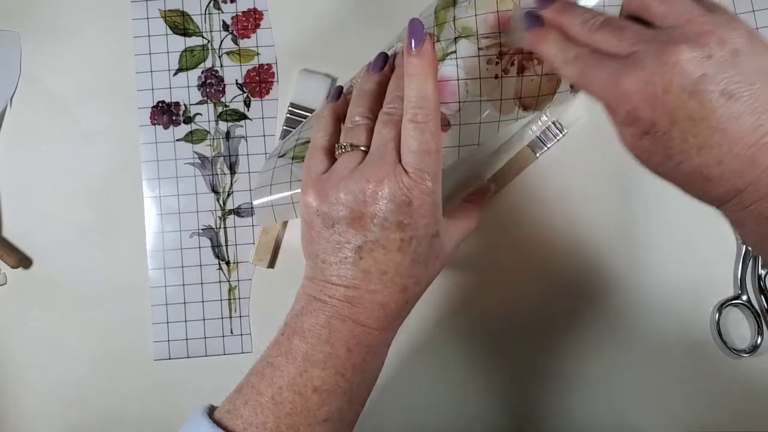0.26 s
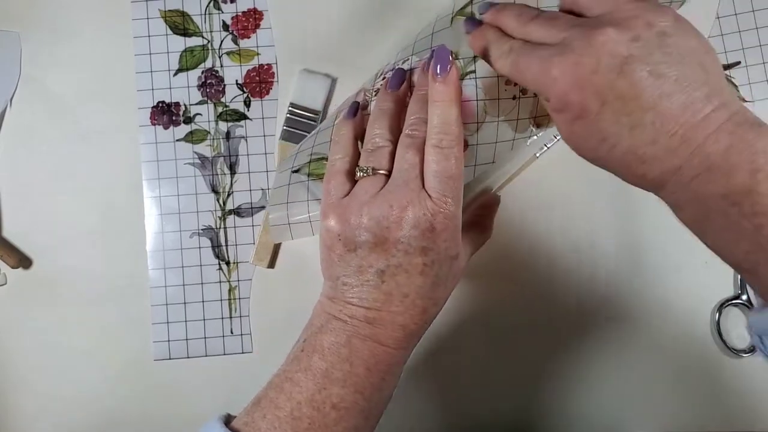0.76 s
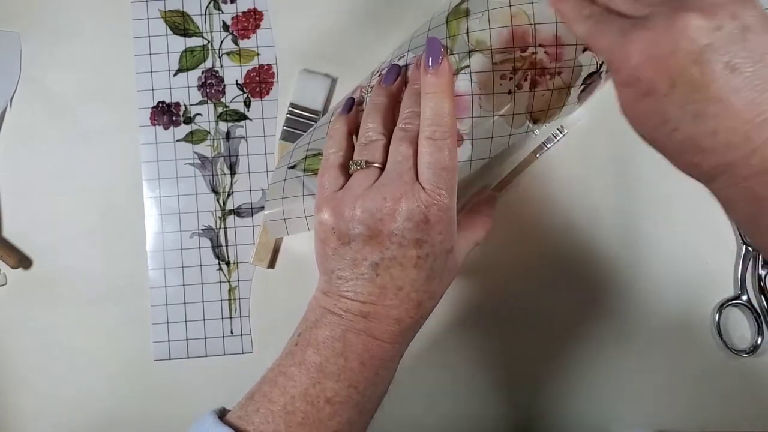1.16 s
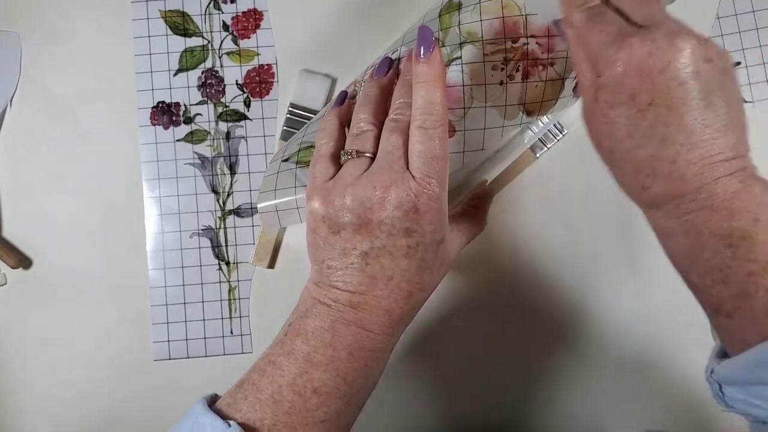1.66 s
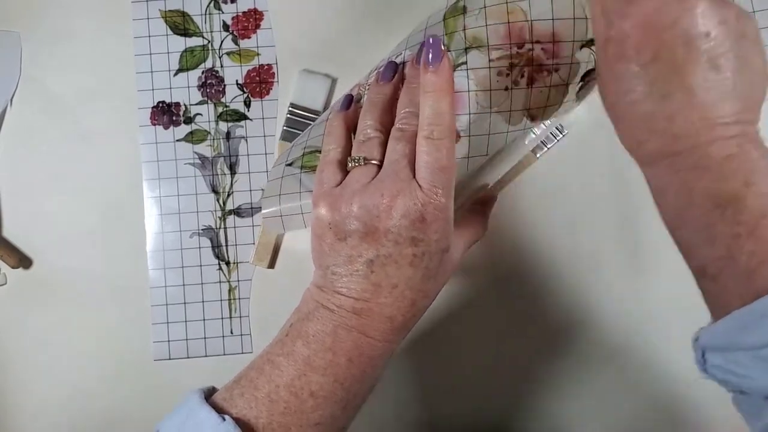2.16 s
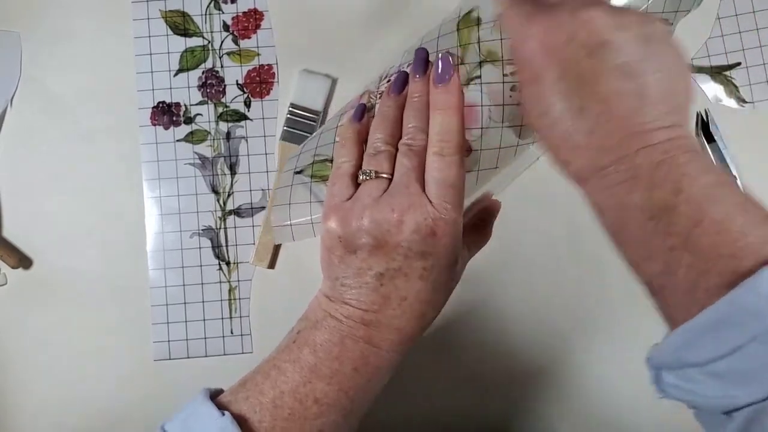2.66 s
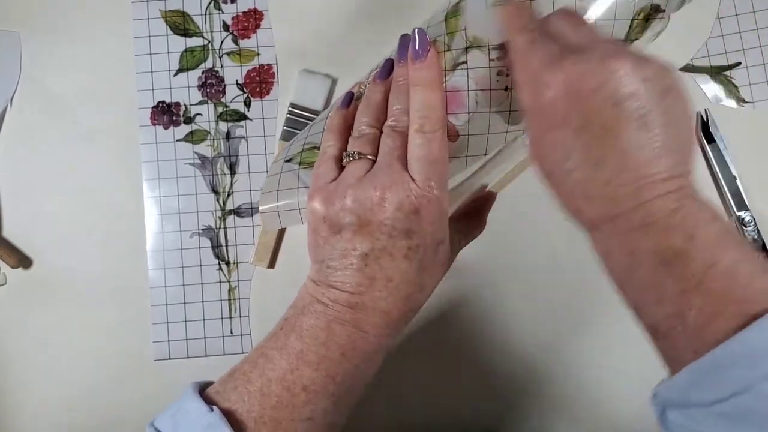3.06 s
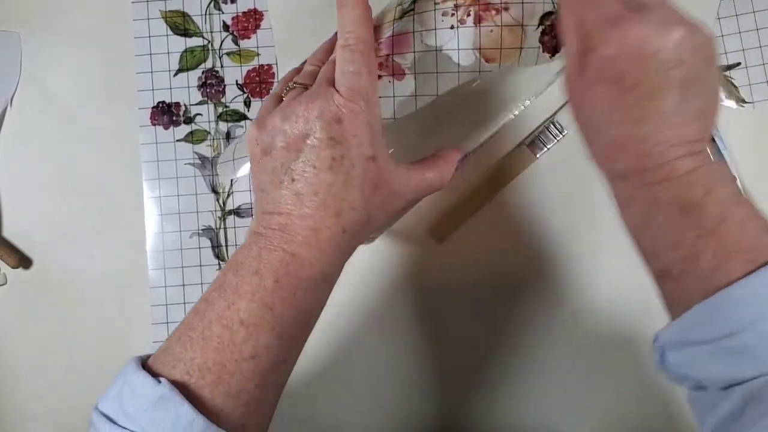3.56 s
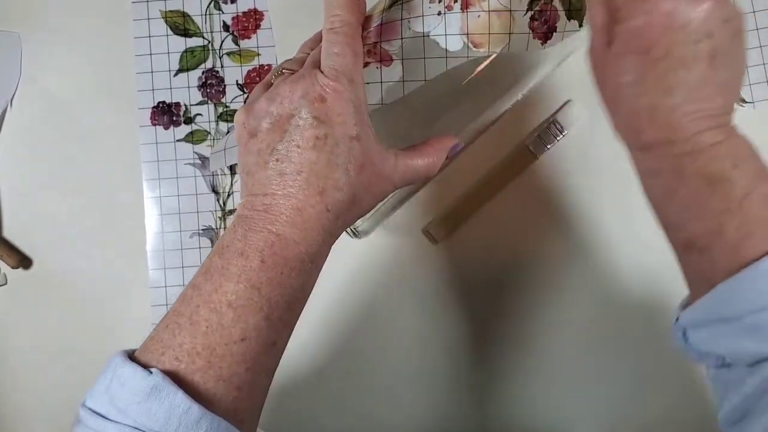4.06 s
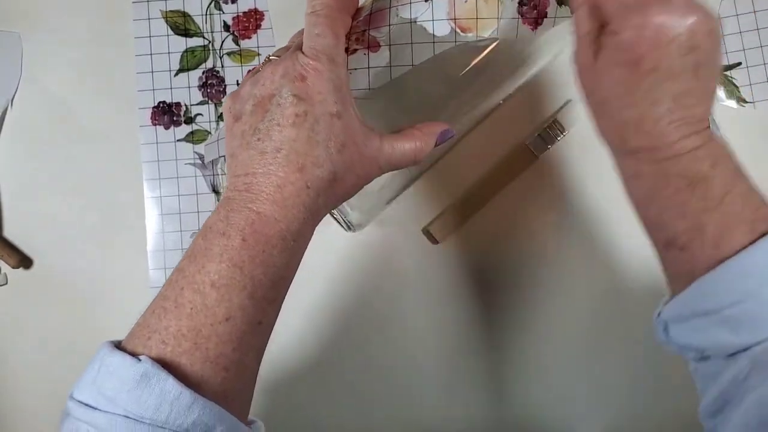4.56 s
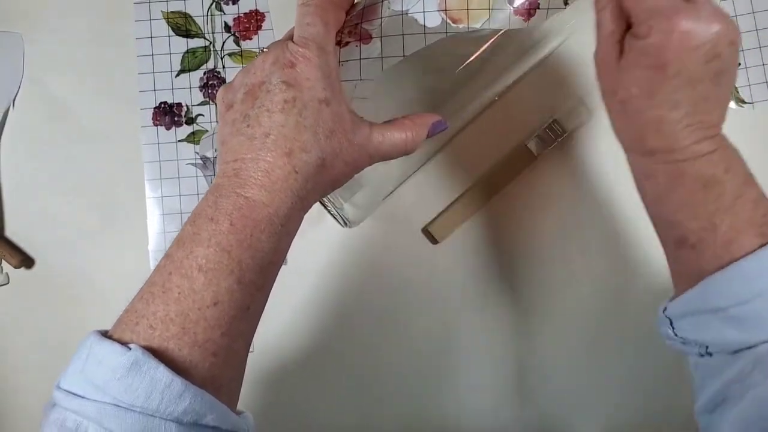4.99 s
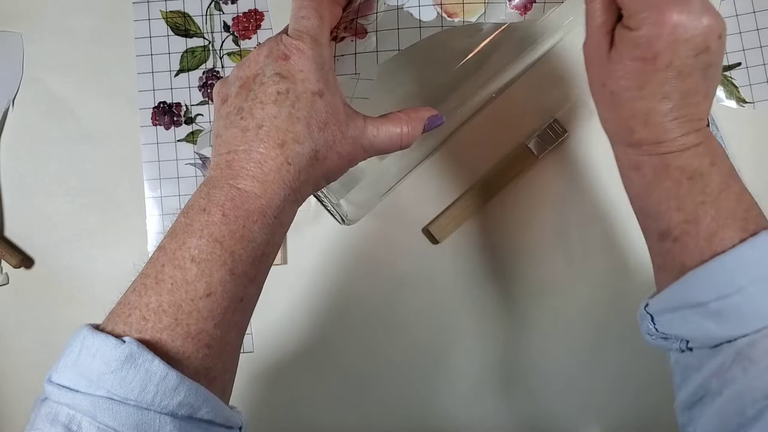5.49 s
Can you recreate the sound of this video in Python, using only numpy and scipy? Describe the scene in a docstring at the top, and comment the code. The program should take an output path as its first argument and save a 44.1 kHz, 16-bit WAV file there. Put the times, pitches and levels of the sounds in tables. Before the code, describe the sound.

Quick hard scraping strokes on a glass jar, nearly silent at first, build into rasping, squeaking rubs with small chirps, ticks and dull table knocks.

```python
"""A small quiet room, a phone with two microphone ports close by: a flat plastic stick is rubbed hard
to and fro over a transfer film on a hand-held glass jar. Grit-like catches of the edge ring the glass
(damped resonances) and the bent stick; the film hisses in noise bands, the push rumbles through jar and table.
Now and then the edge slips with a short chirp or taps the glass, the film crackles or the table knocks."""
import sys
import numpy as np
from scipy import signal
from scipy.fft import rfft, irfft
from scipy.io import wavfile
from scipy.ndimage import uniform_filter1d

SR = 44100
rng = np.random.default_rng(int(sys.argv[2]) if len(sys.argv) > 2 else 0)


def generate_wav(sig):
    """Save sig (samples, or channels by samples) to the path in sys.argv[1] as 16-bit PCM at SR."""
    pcm = np.round(np.clip(np.atleast_2d(sig).T, -1, 1) * 32767).astype(np.int16)
    wavfile.write(sys.argv[1], SR, pcm)


N = 252693


def undb(db):
    """Turn dB into gain."""
    return 10 ** (np.asarray(db) / 20)


def level(x, db):
    """Set the rms level."""
    return x * undb(db) / np.sqrt(np.mean(x ** 2))


def colour(x, points):
    """Shape a sound by (f/Hz, level/dB) points with a causal, minimum-phase response."""
    hz, db = np.transpose(points)
    grid = np.linspace(1, SR / 2, 2049)
    log_gain = np.interp(np.log(grid), np.log(hz), db) * np.log(10) / 20
    cepstrum = irfft(log_gain)
    # fold the cepstrum onto positive times to make it causal
    cepstrum[1:2048] *= 2
    cepstrum[2049:] = 0
    return signal.oaconvolve(x, irfft(np.exp(rfft(cepstrum))))[:N]


def ring(x, hz, width_hz):
    """One resonance, gain near 1 at its centre; the complex output carries the phase."""
    pole = np.exp((2j * np.pi * hz - np.pi * width_hz) / SR)
    return 2 * (1 - abs(pole)) * signal.lfilter([1], [1, -pole], x)


def walk(rate):
    """Random levels, a new one every 1 / rate s, slewed between; spread near 1."""
    hold = int(SR / rate)
    steps = np.repeat(rng.standard_normal(N // hold + 1), hold)
    return 1.41 * uniform_filter1d(steps, hold)[:N]


def grit(spread_db):
    """Dense tiny catches: most are faint, a few stand out."""
    noise = rng.standard_normal(N)
    prominence = rng.exponential(size=N).clip(0, 6)
    return level(noise * undb(spread_db * prominence), 0)


def add(track, s, sound):
    """Mix a sound in at a time."""
    i = int(s * SR)
    track[i:i + len(sound)] += sound[:len(track) - i]


# strokes, alternately back and forth: start t/s, length t/s, place of the hardest push [0-1], scrape level/dB
STROKES = [(0.068, 0.12, 0.02, -99), (0.238, 0.084, 0.53, -77.5), (0.397, 0.13, 0.04, -88),
           (0.535, .11, .42, -79), (0.689, 0.082, 0, -79), (0.841, 0.073, 1, -87), (0.932, 0.12, 0.21, -71),
           (1.102, 0.09, 0.63, -67.5), (1.19, .14, 0.39, -74), (1.386, .12, 0.54, -72),
           (1.511, 0.18, 0, -89), (1.636, .13, 0.41, -53), (1.787, .11, 0.45, -45),
           (1.956, 0.11, 0.3, -47.5), (2.058, .12, 0.47, -34.5), (2.227, 0.099, 0.29, -54),
           (2.357, .1, .42, -45), (2.476, 0.1, 0.22, -46.5), (2.632, .12, 0.42, -40.5),
           (2.742, 0.11, 0.32, -44.5), (2.897, 0.11, 0.47, -47.5), (3.008, 0.11, 0.62, -41),
           (3.145, 0.11, 0.54, -36), (3.259, .13, .5, -39.5), (3.376, .15, 0.46, -35.5),
           (3.547, 0.11, 0.28, -33.5), (3.652, 0.13, 0.47, -35), (3.812, 0.1, 0.5, -31.5),
           (3.917, .11, 0.33, -31.5), (4.048, 0.08, 0.76, -31.5), (4.155, 0.13, 0.31, -32.5),
           (4.294, 0.11, 0.57, -29.5), (4.416, .11, 0.47, -35.5), (4.559, .11, 0.42, -39),
           (4.691, 0.094, .52, -36.5), (4.807, 0.094, 0.51, -39.5), (4.914, .11, 0.45, -39.5),
           (5.022, 0.093, 0.54, -40), (5.162, 0.094, 0.41, -38), (5.266, 0.11, 0.27, -40.5),
           (5.409, 0.073, 0.52, -46.5), (5.524, .12, 0.41, -42.5), (5.666, 0.12, .35, -50)]


def strokes(levels_db, ends_db, grip, release, skewed=True):
    """The edge speeds up and slows down once a stroke; a layer is ends_db weaker at the turns and dies beyond.
    High grip or release powers give a flat top with a sudden start or end."""
    out = np.full(N, 1e-7)
    for (s, length, place, _), db in zip(STROKES, levels_db):
        u = np.linspace(-.5, 1.5, int(2 * length * SR))  # 0 and 1 are the turns
        top = np.clip(place, .1, .9) if skewed else .5
        before = (abs(u - top) / top) ** grip
        after = (abs(u - top) / (1 - top)) ** release
        fade = np.where(u < top, before, after)
        add(out, max(s - length / 2, 0), undb(db - ends_db * fade))
    return out


BEARS_DOWN_S = 1.6  # from here on, back strokes differ from forward ones


def per_stroke(curve, back_db=0):
    """Level of each stroke from a curve; every other stroke is a back stroke."""
    start = np.transpose(STROKES)[0]
    back = (np.arange(len(start)) % 2 == 0) & (start > BEARS_DOWN_S)
    return np.interp(start, *np.transpose(curve)) + back_db * back


# drive of the lowest glass mode on forward strokes: t/s, relative level/dB
LOWEST_DRIVE = [(0, -71), (1.2, -73.5), (1.38, -62), (1.52, -77), (1.64, -47), (1.94, -38.5), (2.47, -48),
                (2.75, -37), (3.02, -34.5), (3.3, -33), (3.55, -35), (4.05, -40), (4.3, -36.5), (4.56, -34),
                (4.8, -39), (5.7, -36)]
# drive of the second glass mode on forward strokes: t/s, relative level/dB
SECOND_DRIVE = [(0, -95), (0.55, -80.5), (1.1, -74.5), (1.38, -85), (1.64, -55.5), (1.94, -39.5),
                (2.35, -38.5), (2.55, -50), (2.75, -42), (3.8, -36), (3.92, -55), (4.16, -35), (4.36, -42),
                (4.56, -31.5), (4.8, -31), (5.53, -33.5), (5.67, -45)]
LOWEST_BACK_DB, SECOND_BACK_DB = -13, -3  # back strokes drive them less


def edge_forces():
    """The same catches of the edge drive the scrape and the two lowest glass modes, each by its own strokes."""
    # the pressure judders within a stroke
    catches = grit(3.7) * undb(2.0 * walk(110))
    scrape = catches * strokes(np.transpose(STROKES)[-1], ends_db=37.0, grip=0.94, release=0.9)
    low_db = per_stroke(LOWEST_DRIVE, LOWEST_BACK_DB)
    low = catches * strokes(low_db, ends_db=39.0, grip=2.57, release=3.23)
    second_db = per_stroke(SECOND_DRIVE, SECOND_BACK_DB)
    second = catches * strokes(second_db, ends_db=37.0, grip=2.97, release=2.72)
    return scrape, low, second


# hand-damped glass modes: f/Hz, width f/Hz, level/dB, left minus right level/dB, half the phase lead of the left [rad]
GLASS_MODES = [(1626, 37, -7, -1.5, 0.24), (2792, 52.3, 1.5, -3.5, 0.63), (3320, 11, -22, -1, -0.36),
               (3448, 91, -7, -9, -0.18), (3810, 90, -5, 8, 1), (3969, 82, -1.5, -3, 0.52),
               (4950, 52, -8.5, 14.5, -0.78), (5430, 71, -12.5, -13, -0.36), (6380, 21, -29, 31, -1.9),
               (7620, 16, -35.5, 25, 0.45), (10600, 37, -38, -7, .3)]
MODE_WANDER = .004  # the grip detunes the glass by this share


def glass(low, second, scrape, brush, blows):
    """The two lowest modes have their own drive; the others swell and fade as the edge crosses their patterns.
    Each reaches the two microphone ports in its own phase."""
    out = np.zeros((2, N))
    for k, (hz, width_hz, db, pan_db, lead) in enumerate(GLASS_MODES):
        if k < 2:
            rub = (low, second)[k]
        else:
            brush_db = 0 if hz > 6000 else -30
            rub = (scrape + brush * undb(brush_db)) * undb(4.0 * walk(20))
        z = ring((rub + blows) * undb(db), hz, width_hz)
        z = z * np.exp(2j * np.pi * np.cumsum(MODE_WANDER * hz * walk(12)) / SR)
        turn = np.exp(1j * (lead + .35 * walk(9)))
        out += [(z * turn).imag * undb(pan_db / 2), (z / turn).imag * undb(-pan_db / 2)]
    # the wall radiates little below its lowest mode
    return signal.sosfilt(signal.butter(4, 1000, "high", fs=SR, output="sos"), out)


# the scrape swells and fades in these bands, each on its own: f/Hz
RASP_BANDS_HZ = [1300, 2100, 3120, 4280]


def rasp(x):
    """The colour of the scrape shifts within a stroke as the edge catches here and there."""
    bands = sum(undb(4.5 * walk(40)) * ring(x, hz, .3 * hz).real for hz in RASP_BANDS_HZ)
    return undb(-6) * x + bands / 2


FLEX_BACK_DB = 3  # the stick bends harder on back strokes


def bending():
    """Fine grit bends the stick once a stroke."""
    bend_db = np.transpose(STROKES)[-1] + per_stroke([(0, 0)], FLEX_BACK_DB)
    return grit(1.6) * strokes(bend_db, ends_db=45.5, grip=1.75, release=1.24)


def flex(force, hz, width_hz, rise, drift):
    """A broad resonance of the bent stick: it glides by rise (down if negative) through each stroke
    and back after it, and wanders with the grip."""
    start, length = np.transpose(STROKES)[:2]
    turns = np.sort(np.stack([start, start + .9 * length], axis=1).ravel())
    along = np.interp(np.arange(N) / SR, turns, np.tile([-1, 1], len(start)))
    phase = 2 * np.pi * np.cumsum(hz * (1 + rise * along + drift * walk(11))) / SR
    # filter around 0 Hz, then shift up to the moving centre
    envelope = ring(ring(force, 0, width_hz), 0, width_hz)
    return (envelope * np.exp(1j * phase)).imag


# colour of the flexing blade: f/Hz, level/dB
STICK_COLOUR = [(820, -40.5), (940, -1.5), (1000, -4.5), (1300, 0.5), (2000, -0.5), (4200, 4), (5500, -12),
                (7000, -28.5)]


def stick(scrape, low, second, bend, slide, chirps):
    """The flexing blade sounds the rasp and the slips; two gliding resonances follow its bend and the slide."""
    rubbing = rasp(scrape + undb(-7) * second + undb(-22.5) * low)
    blade = undb(-2.0) * colour(rubbing, STICK_COLOUR) + undb(-5.0) * chirps
    blade += undb(4) * flex(bend, 3100, 647, 0.38, 0.05)
    return blade + undb(-10.0) * flex(slide, 1200, 270, -0.0366, 0.064)


# slips of the edge, and at 5.20 and 5.28 s two short ticks of the edge on the glass that ring at one pitch:
# t/s, relative level/dB, chatter f/Hz, fall t/ms
SLIPS = [(2.1275, -26, 3470, 2.5), (2.252, -36.5, 2733, 4.3), (2.3946, -27.5, 2680, 5.3),
         (2.674, -23, 3320, 12), (2.771, -31.5, 2700, 13), (3.5741, -13.5, 3740, 1.4),
         (3.5879, -16.5, 3956, 5), (3.844, -25.5, 3940, 4.8), (3.859, -15.5, 3640, 1.7),
         (3.9516, -6.5, 4184, 2.1), (4.093, -14, 3900, 3.5), (4.196, -8.5, 4110, 1.1),
         (4.2122, -24, 3700, 1.7), (4.344, -17, 3790, 4.8), (4.355, -4, 3830, 0.52), (4.465, -20, 2950, 5),
         (5.065, -24.5, 3900, 2.7), (5.2033, -22.5, 3530, 0.58), (5.278, -25, 2890, 1.6)]
SLIP_RISE_SHARE = 0.27  # of the fall time
UNDERTONE_HZ, UNDERTONE_DB, UNDERTONE_FALL_MS = 2700, -9.5, 5.9  # a lower chatter under every slip


def slip_shape(t, fall_ms):
    """A quick rise and an exponential fall, as the edge lets go."""
    rise = (1 - np.exp(-1000 * t / (SLIP_RISE_SHARE * fall_ms))) ** 2
    return rise * np.exp(-1000 * t / fall_ms)


def slips():
    """The edge lets go with a click and chatters for a few milliseconds, over a weaker low chatter."""
    out, t = np.zeros(N), np.arange(2048) / SR
    undertone = np.sin(2 * np.pi * UNDERTONE_HZ * t)
    under = undb(UNDERTONE_DB) * slip_shape(t, UNDERTONE_FALL_MS) * undertone
    for s, db, hz, fall_ms in SLIPS:
        noise = rng.standard_normal(len(t))
        chatter = np.sin(2 * np.pi * hz * t) + .35 * ring(noise, hz, 2000.).imag
        add(out, s, undb(db) * (slip_shape(t, fall_ms) * chatter + under))
    return out


# taps of the edge on the glass: t/s, relative level/dB, dry click over the ring level/dB
TAPS = [(0.9513, -53, -6), (1.546, -43, -7), (4.261, -27.5, -3), (5.2317, -9, -1.5), (5.48, -12.5, -0.5),
        (5.545, -28, -5)]
# colour of a tap: f/Hz, level/dB
TAP_COLOUR = [(300, -11), (1500, -16), (3000, -4), (5500, -3), (8000, -15), (11000, -13), (15000, -23)]


def taps():
    """A hard tick with a short rattle after it: the blow that rings the glass, and the click heard directly."""
    blow, click, t = np.zeros(N), np.zeros(N), np.arange(2048) / SR
    fall = np.exp(-t / 0.0026) + undb(-20.0) * np.exp(-t / 0.012)
    for s, db, click_db in TAPS:
        tick = undb(db) * rng.standard_normal(len(t)) * fall
        add(blow, s, tick)
        add(click, s, undb(click_db) * tick)
    return colour(blow, TAP_COLOUR), colour(click, TAP_COLOUR)


# drive of the film hiss: t/s, relative level/dB
HISS_DRIVE = [(0, -76), (0.4, -68.5), (0.69, -58), (1.1, -53), (1.2, -58), (1.52, -64), (1.64, -55),
              (1.94, -51.5), (2.7, -58), (3.15, -52.5), (3.3, -55), (5.55, -54.5)]


def film_slide():
    """Fine grit slides over the film under each stroke, with a fluttering level."""
    slide = grit(2.2) * strokes(per_stroke(HISS_DRIVE), ends_db=9.0, grip=2.1, release=2.7, skewed=False)
    return slide * undb(1.6 * walk(40) + 1.6 * walk(150))


# crackles of the film as it peels: t/s, relative level/dB, fall t/ms
CRACKLES = [(0.594, -50.5, 7.6), (2.031, -49, 1.3), (3.215, -36, 13)]


def crackles():
    """Short bright bursts of grit from the film."""
    out, t = np.zeros(N), np.arange(2048) / SR
    for s, db, fall_ms in CRACKLES:
        add(out, s, undb(db) * np.exp(-1000 * t / fall_ms))
    return out * grit(4.0)


# colour of the film: f/Hz, level/dB
FILM_COLOUR = [(2350, -67), (4520, -33), (5100, 3), (5600, -10), (7270, -13.5), (10300, -4.5),
               (16000, -2.5)]
# centres of the patches of the hiss: f/Hz
HISS_BANDS_HZ = [6950, 7800, 9600, 13400]
HISS_PATCH_DB, HISS_SIDE_DB = -3.5, -14.5


def patchy(x):
    """Broad bands of the hiss swell and fade, each on its own."""
    bands = sum(undb(HISS_PATCH_DB + 6 * walk(35)) * ring(x, hz, .25 * hz).real for hz in HISS_BANDS_HZ)
    return colour(x + bands, FILM_COLOUR)


def film(slide):
    """The film hisses in patches, a little differently at each microphone port."""
    other = slide * rng.choice([-1, 1], N)  # same envelope, unrelated noise
    return patchy(slide) + undb(HISS_SIDE_DB) * patchy(other) * np.array([[1], [-1]])


# jolts of the jar against the table: t/s, relative level/dB, f/Hz
JOLTS = [(1.548, -45, 121), (2.117, -46.5, 118), (2.244, -44, 130), (2.481, -46, 132), (2.759, -41.5, 300),
         (3.026, -39, 277), (3.855, -36.5, 228), (4.038, -44.5, 232), (4.079, -43, 275),
         (4.297, -40.5, 136), (4.349, -37, 218), (4.608, -42, 326), (5.044, -39.5, 361),
         (5.276, -32.5, 144), (5.547, -32.5, 134)]
JOLT_CYCLES = 0.97  # fall time in cycles; higher knocks are shorter


def jolts():
    """Dull knocks of the table top, a few cycles each."""
    out, t = np.zeros(N), np.arange(8192) / SR
    for s, db, hz in JOLTS:
        fall = np.exp(-t * hz / JOLT_CYCLES)
        add(out, s, 4 * undb(db) * (1 - fall) * fall * np.sin(2 * np.pi * hz * t))
    return out


# drive of the rumble on forward strokes: t/s, relative level/dB
RUMBLE_DRIVE = [(0, -72), (1.38, -64), (1.52, -85), (1.64, -54.5), (3.0, -47), (3.5, -57), (3.8, -45),
                (4.8, -44), (5.26, -40.5), (5.7, -43)]
RUMBLE_BACK_DB = -2  # back strokes push less
# colour of the table: f/Hz, level/dB
TABLE_COLOUR = [(130, -3), (160, -7), (200, -4), (340, -5), (450, -16.5), (650, -15.5), (1000, -37)]


def table_rumble():
    """The uneven push of each stroke shakes jar and table with low-coloured grit; jolts knock on top."""
    push_db = per_stroke(RUMBLE_DRIVE, RUMBLE_BACK_DB)
    push = strokes(push_db, ends_db=10.5, grip=1.13, release=2.3, skewed=False)
    push *= undb(3.3 * walk(45))
    return level(colour(grit(4.75), TABLE_COLOUR), -6.5) * push + jolts()


ROOM_T60_S, ROOM_DB = .19, -1.5  # decay by 60 dB, energy of the tail


def room(x):
    """A short dense tail of decaying noise, different at each microphone port."""
    t = np.arange(int(ROOM_T60_S * SR)) / SR
    tails = rng.standard_normal((2, len(t))) * np.exp(-np.log(1000) * t / ROOM_T60_S)
    tails *= undb(ROOM_DB) / np.sqrt(np.sum(tails ** 2, axis=1, keepdims=True))
    return np.array([signal.oaconvolve(x, tail)[:N] for tail in tails])


# colour of the room tone: f/Hz, level/dB
AIR_COLOUR = [(12, -47), (20, -3.5), (68, 2), (780, -38), (1660, -36.5), (2140, -40.5), (4420, -44.5),
              (6720, -33.5), (8000, -49.5), (16000, -52)]
AIR_DB = -62  # rms over both ports


def air():
    """Quiet room tone: the bass is alike left and right, the treble is not."""
    mid, side = (colour(rng.standard_normal(N), AIR_COLOUR) for _ in range(2))
    side = colour(side, [(200, -12.0), (600, 1.0)])
    return level((mid + side * np.array([[1], [-1]])) * undb([[-1.1], [1.1]]), AIR_DB)


def scene():
    """Stick, film, jar and table close to the phone, in the room."""
    scrape, low, second = edge_forces()
    slide = film_slide()
    bend = bending()
    chirps = slips()
    blows, ticks = taps()
    jar = glass(undb(30.0) * low, undb(21.5) * second, undb(18.0) * scrape,
                brush=undb(24.0) * slide, blows=undb(13.5) * (chirps + blows))
    blade = stick(scrape, low, second, bend, slide, chirps)
    hiss = undb(-6) * film(slide + crackles())
    rumble = table_rumble()
    # each source sits slightly to one side
    near = (blade + ticks) * undb([[-.9], [.9]])
    near += hiss * undb([[.7], [-.7]])
    near += rumble * undb([[-.8], [.8]])
    # the table's upper ring reaches the two ports out of step
    near += undb(-7.5) * ring(rumble, 730, 230).real * np.array([[1], [-.5]])
    to_room = undb(-6.0) * jar.mean(axis=0) + blade + ticks / 2
    to_room += undb(-24.0) * hiss[0] + undb(-8) * rumble
    return jar + near + room(to_room) + air()


TOP_HZ = 15750  # upper limit of the phone


def record(dry):
    """The phone's microphone path drops the deepest bass and cuts the top."""
    dry = signal.sosfilt(signal.butter(2, 35, "high", fs=SR, output="sos"), dry)
    return signal.sosfilt(signal.ellip(10, .2, 60, TOP_HZ, fs=SR, output="sos"), dry)


dry = scene()
out = record(dry)
generate_wav(out)
```